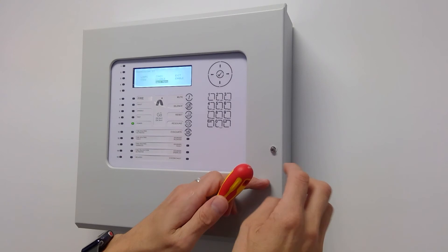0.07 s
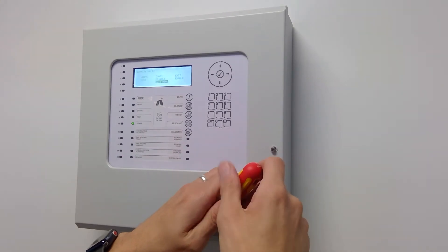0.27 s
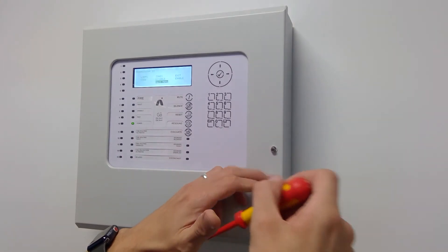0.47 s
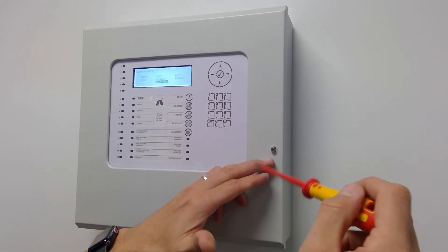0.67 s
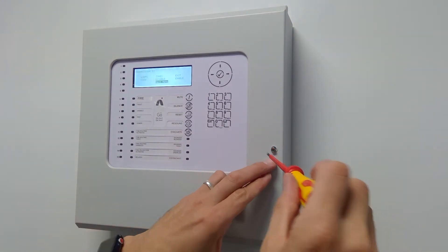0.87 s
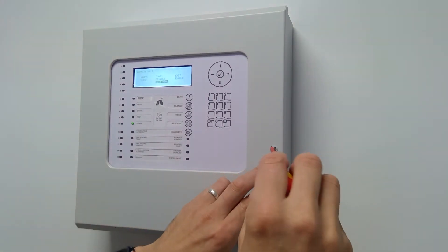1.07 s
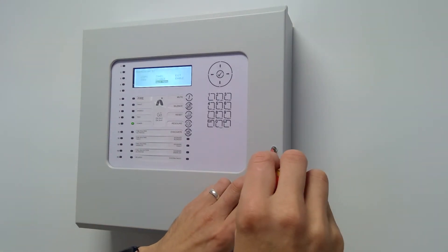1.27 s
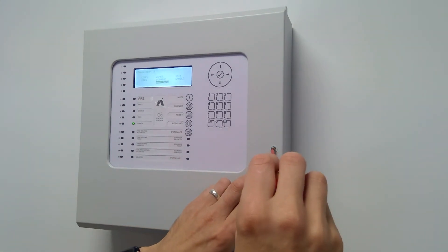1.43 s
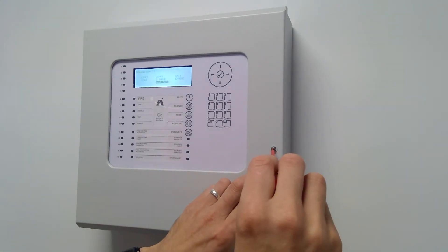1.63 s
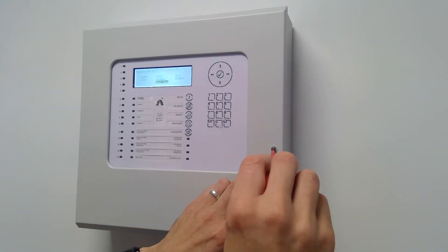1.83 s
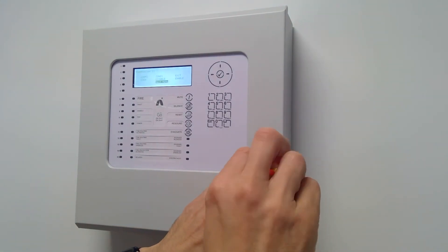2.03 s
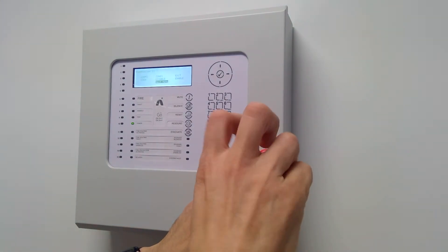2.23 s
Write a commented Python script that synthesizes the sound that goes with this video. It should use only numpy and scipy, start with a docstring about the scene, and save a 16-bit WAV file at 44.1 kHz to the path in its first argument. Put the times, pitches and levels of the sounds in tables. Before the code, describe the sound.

A sheet-metal cabinet door gives one loud ringing clunk, then a softer, duller one; after a lull, light screwdriver ticks and faint finger rubs. Small quiet room, low rumble, close microphone, contacts slightly right.

```python
"""Over a low, uneven rumble in a small, quiet room, hands rub lightly over a sheet-metal cabinet door.
The door is pushed home on its hinges with a strong clunk and then a softer one, faint pings between.
After a lull a screwdriver ticks and catches at its edge, amid rubs and the groans of a fingertip.
Blows, ticks and rubs are forces convolved with one panel's ring; groans and pings are swept or decaying
sines with a room echo. All contacts sit a little right of a close microphone."""
import sys
import numpy as np
from scipy import signal
from scipy.fft import rfft, irfft
from scipy.io import wavfile
from scipy.ndimage import uniform_filter1d

SR = 44100
rng = np.random.default_rng(int(sys.argv[2]) if len(sys.argv) > 2 else 0)


def output_pcm(signal):
    """Save a mono or channel-first signal as 16-bit PCM at the path in sys.argv[1].

    Samples are clipped to [-1, 1] before scaling.
    """
    pcm = np.clip(np.atleast_2d(signal).T, -1, 1) * 32767
    wavfile.write(sys.argv[1], SR, np.round(pcm).astype(np.int16))


N = 101429
T = np.arange(N) / SR
F = np.fft.rfftfreq(2 * N, 1 / SR)  # bins of the double-length transform, in Hz

# All levels are relative: further trims and filters shape the final loudness.
# Rumble over time: (time [s], level [dB])
RUMBLE_LEVEL = [(0.0, -42.5), (0.22, -48), (0.58, -44.5), (0.62, -43), (0.65, -48.5), (1.2, -59),
                (1.27, -69), (1.57, -69), (1.84, -48), (1.91, -60.5), (2.19, -53), (2.3, -57.5)]
# Rumble spectrum: (frequency [Hz], density [dB per Hz])
RUMBLE_SPECTRUM = [(10, 0), (22, 2.5), (45, -2), (80, -17.5), (130, -22.5), (200, -40), (300, -38),
                   (600, -56), (1500, -76)]
# Hiss spectrum: (frequency [Hz], density [dB per Hz])
HISS_SPECTRUM = [(100, -8), (400, -15.5), (1200, -7.5), (4000, -24.5), (15000, -20)]
RUMBLE_DB, HISS_DB = 2.5, -95
WHINE_HZ, WHINE_DB = 1295, -105

# Sliding contacts: (start [s], length [s], level [dB], bass [dB], body [dB], treble [dB])
RUBS = [(0.0, 0.026, -37.5, 18.5, 14.5, 7), (0.058, .03, -32, 17, -7, 14), (0.085, 0.0097, -57, 18, 36, 17),
        (0.118, .035, -51.5, 25, 2, 16), (0.15, 0.04, -43.5, 8, -18, 27.5),
        (0.485, 0.017, -41.5, -12.5, 0, 14), (0.752, 0.037, -62.5, 30, 21, 5),
        (0.869, .19, -82.5, 41, 15, -3.5), (1.732, 0.0075, -52, -9, 19, -3),
        (2.012, 0.028, -60, 29.5, 19.5, -16.5), (2.083, .14, -71.5, 38, 31.5, -6.5)]
RUB_RING_DB, RUB_RATE_PER_S, RUB_TOP_HZ = -26, 1800, 9000

# Fingertip juddering on paint: (start [s], swell time scale [s], mean pitch [Hz], level [dB])
JUDDERS = [(0.084, 0.025, 730, -46), (0.12, 0.048, 620, -61), (1.644, 0.026, 662.6, -47.5),
           (1.758, 0.038, 630, -59.5), (2.0, 0.011, 410, -68), (2.018, 0.063, 760, -68),
           (2.048, 0.028, 787, -52), (2.049, 0.044, 402.6, -54.5)]
JUDDER_WIDTH = 0.067  # rms pitch waver, as a fraction of the pitch
JUDDER_ROOM_DB = -4.5

# Light contacts of tool and fingers:
# (time [s], level [dB], bass [dB], body [dB], treble [dB], ring of the modes [dB], top [Hz])
TICKS = [(0.086, -42, 5, 24, 22.5, -26, 9655), (0.170, -33, -0.5, -11, 11.5, -13, 13000),
         (0.499, -40, -10, 4.5, 16, -14.5, 7700), (1.632, -53, -6, -4, 24, -20, 10280),
         (1.6435, -27, -26, 1, 18.5, -15.5, 13000), (1.6485, -26.5, -10.5, 6, -4, -9.5, 12900),
         (1.658, -26, -6, -3, -5, -16.5, 10900), (1.729, -37, -5, 10, 0, -5, 8060),
         (1.736, -39.5, -1, 13.5, -30, -21, 6020), (1.8025, -35.5, 5.5, -13, 25, 1, 12400),
         (1.8085, -17.5, -13, 0.5, -6, -18, 13100), (1.8115, -33, 5.5, 2.5, 3.5, -10.5, 12200),
         (2.043, -35, -15, -14, 5.5, -15, 5950), (2.0485, -36.5, 12, 10.5, 0, -19.5, 6100),
         (2.053, -45.5, 10, 10.5, 1, -12.5, 6000), (2.162, -62, 13.5, 9, -6.5, -10, 5000)]
GRIP_DB_PER_S = 36.5  # damping by the hands during ticks and rubs
# Resonances favoured near the door's edge: (frequency [Hz], gain [dB])
EDGE = [(80, -10), (150, 7.5), (210, -8), (310, 0), (450, -2), (570, 1), (690, 5), (820, 0), (1080, -4.5),
        (1400, 3), (1800, -3), (2250, -1), (2900, -2), (3500, -4)]

# Door blows: (time [s], level [dB], bass [dB], body [dB], treble [dB], ring of the modes [dB],
# damping by the hand [dB per s, sign ignored])
CLUNKS = [(0.202, -1, -0.5, 3, -0.5, -1.5, -4.5), (0.556, -15.5, 4.5, 9, -6.5, -0.5, 13)]

# Screwdriver touching metal: (time [s], level [dB], factor on pitch and decay rate [ratio])
TIPS = [(0.494, -66, 0.41), (0.5, -59.5, 0.57), (1.632, -51.5, 0.95)]
# Its ring at factor 1: (frequency [Hz], level [dB], t60 [s])
TIP_MODES = [(3850, -9, 0.022), (7530, -0.5, 0.023), (7800, -2, 0.0079), (9480, -17, 0.013)]
TIP_ROOM_DB = 5.5

# Centres of the bass, body, middle and treble of a contact: (frequency [Hz])
COLOUR_HZ = [250, 700, 2200, 7500]
# The door's clear modes, before any hand damping:
# (frequency [Hz], level in first blow [dB], level in later contacts [dB], t60 [s])
MODES = [(166, -25, -18, .55), (231, -10, -6, .26), (285, -13, -16, .42), (335, -13, -12, .2),
         (368, -6, -13, .16), (522, -15, -10, .22), (561, -11, -15, .27), (731, -14, -11, .22),
         (1120, -15, -20, .18), (1190, -16, -16, .22), (1716, -17, -20, .24), (1925, -6, -14, .18),
         (2649, -1, -15, .14), (3537, -17, -19, .2), (982, -23, -24, .45), (1290, -32, -20, .4),
         (2355, 2, 0, .2)]
MODE_DB, MODE_LATE_SHARE, MODE_BUILD_S = -14, .6, 0.0075
# Dense wash of panel and room: (frequency [Hz], density [dB per Hz])
WASH = [(60, -33), (150, -13.5), (290, 1.5), (400, -3.5), (620, -9), (900, -11.5), (1500, -13), (2100, -9),
        (2500, -8), (3100, -16.5), (4500, -18.5), (6500, -28), (10000, -36.5), (15000, -40.5)]
# Its decay before any hand damping: (frequency [Hz], t60 [s])
WASH_T60 = [(100, .5), (260, 0.26), (700, 0.27), (1840, 0.25), (4850, 0.17), (12800, 0.063)]
# Direct sound and first reflections: (delay [s], level [dB])
PATHS = [(0, 3), (.003, -2), (.0087, -1.5)]
WASH_DB, DIRECT_DB = -17.5, 3.5
CROWD_DB, CROWD_T60_S = -33.5, .24  # weak upper modes, before hand damping

# Left minus right: (frequency [Hz], level difference [dB])
BALANCE = [(100, -.6), (600, -1.2), (1300, -3), (2400, -6.5), (4400, -8), (8000, -7), (15000, -5)]
# Likeness of the two channels: (frequency [Hz], correlation [0-1])
LIKENESS = [(300, 0.96), (700, 0.55), (2000, 0.28), (5000, 0.84), (12000, 0.27)]
LEFT_LAG_S, ROOM_T60_S, TOP_HZ = .00008, 0.079, 15900


def undb(db):
    """Decibels to gain."""
    return 10 ** (np.asarray(db) / 20)


def at(table, hz):
    """Read a table on a log-frequency axis."""
    points = np.array(table, float)
    return np.interp(np.log(np.maximum(hz, 1)), np.log(points[:, 0]), points[:, 1])


def unit(x):
    """Scale to rms 1."""
    return x / np.sqrt(np.mean(x ** 2))


def decay(age, t60):
    """Exponential decay that falls 60 dB in t60 seconds."""
    return np.exp(-np.log(1000) * age / t60)


def through(x, response):
    """Filter by a frequency response."""
    return irfft(rfft(x, 2 * N) * response)[..., :N]


def causal(db):
    """The quickest causal (minimum-phase) response with these gains, by folding the cepstrum."""
    cepstrum = irfft(np.log(undb(db)))
    cepstrum[1:N] *= 2
    cepstrum[N + 1:] = 0
    return np.exp(rfft(cepstrum))


def rolloff(hz):
    """Gain in dB of a steep low-pass."""
    return -10 * np.log10(1 + (F / hz) ** 8)


def noise_pair(likeness):
    """Left and right noise, partly alike."""
    mid, side = rng.standard_normal((2, N))
    c = np.clip(likeness, 0, 1)
    return np.sqrt((1 + c) / 2) * mid + np.sqrt((1 - c) / 2) * np.array([side, -side])


def damped(body, db_per_s):
    """A hand on the sheet shortens its ring."""
    return body * undb(-abs(db_per_s) * T)


def echoed(x, likeness, room_db):
    """Add the short echo of the room, a decaying noise response."""
    room = noise_pair(likeness) * decay(T, ROOM_T60_S)
    return x + undb(room_db) * through(x, rfft(unit(room) / np.sqrt(N), 2 * N))


def background():
    """A low rumble that comes and goes, very faint hiss and a trace of steady whine."""
    level = undb(RUMBLE_DB + np.interp(T, *np.array(RUMBLE_LEVEL).T))
    rumble = unit(through(noise_pair(0.99), undb(at(RUMBLE_SPECTRUM, F))))
    whine = undb(WHINE_DB) * np.sin(2 * np.pi * WHINE_HZ * T)
    hiss = unit(through(noise_pair(0.6), undb(at(HISS_SPECTRUM, F))))
    return level * rumble + whine + undb(HISS_DB) * hiss


def wash():
    """The crack of a contact, its first reflections, and the dense ring of panel and room."""
    out, power = 0, 0
    for hz in 63 * 2 ** (np.arange(25) / 3):  # third-octave bands
        shape = np.cos(np.pi / 2 * np.clip(3 * np.log2((F + 1) / hz), -1, 1))
        fall = undb(-60 * T / at(WASH_T60, hz))
        band = through(noise_pair(at(LIKENESS, hz)), shape) * fall
        gain = undb(at(WASH, hz)) * np.sqrt(hz)  # bands widen with frequency
        out = out + gain * unit(band) * np.sqrt(np.mean(fall ** 2))
        power += gain ** 2
    paths = np.zeros(N)
    for delay, db in PATHS:
        paths[int(delay * SR)] += undb(db)
    crack = unit(through(paths, causal(at(WASH, F)))) / np.sqrt(N)
    return undb(WASH_DB) * out / np.sqrt(power) + undb(DIRECT_DB) * crack


def crowd(count=360):
    """Many weak modes of the sheet, scattered over the treble along the wash's spectrum."""
    lines = np.zeros((2, len(F)), complex)
    for u, size, left, right in rng.random((count, 4)):
        hz = 2800 * 5 ** u
        strength = undb(at(WASH, hz)) * np.sqrt(hz) * size ** 2
        phases = np.exp(2j * np.pi * np.array([left, right]))
        lines[:, np.searchsorted(F, hz)] += strength * phases
    return undb(CROWD_DB) * unit(irfft(lines)[:, :N]) * decay(T, CROWD_T60_S)


def ring():
    """The door's modes for two places of contact; part builds up as the blow spreads through the sheet."""
    build = 1 - MODE_LATE_SHARE * np.exp(-T / MODE_BUILD_S)
    out = np.zeros((2, N))
    for hz, first_db, later_db, t60 in MODES:
        out += undb([[first_db], [later_db]]) * np.sin(2 * np.pi * hz * T) * decay(T, t60)
    return undb(MODE_DB) * build * out


def touch(force, body, level_db, bass_db, body_db, treble_db, top_db=0):
    """A force sounds the door, coloured by the place and hardness of the contact."""
    colour = at(list(zip(COLOUR_HZ, (bass_db, body_db, 0, treble_db))), F)
    return through(body, rfft(force, 2 * N) * causal(level_db + colour + top_db))


def rubs(dense, modes):
    """Stick and slip: a brief swell of tiny uneven catches."""
    body = dense + undb(RUB_RING_DB) * modes
    out = 0
    for start, length, db, bass, mid, treble in RUBS:
        swell = np.sqrt(np.abs(np.sin(np.pi * np.clip((T - start) / length, 0, 1))))
        catches = rng.random(N) < RUB_RATE_PER_S / SR
        force = swell * catches * rng.standard_normal(N)
        force = force / (np.linalg.norm(force) + 1e-12)
        out = out + touch(force, body, db, bass, mid, treble, rolloff(RUB_TOP_HZ))
    return out


def judders():
    """Brief rough groans as a fingertip sticks and slips, with their echo in the room."""
    out = 0
    for start, length, hz, db in JUDDERS:
        age = np.maximum(T - start, 0) / length
        swell = np.sqrt(age) * np.exp(.5 - 2 * age ** 2) * np.sqrt(2)
        waver = unit(uniform_filter1d(rng.standard_normal(N), size=150))
        phase = 2 * np.pi * np.cumsum(hz * (1 + JUDDER_WIDTH * waver)) / SR
        out = out + undb(db) * np.sqrt(2) * swell * np.sin(phase)
    return echoed(out, 0.93, JUDDER_ROOM_DB)


def ticks(dense, modes):
    """Light sharp contacts, each an impulse on the door with its own limit on the top."""
    out = 0
    for k, (start, db, bass, mid, treble, ring_db, top_hz) in enumerate(TICKS):
        impulse = signal.unit_impulse(N, int(start * SR))
        body = dense[k % len(dense)] + undb(ring_db) * modes  # alternate the two washes
        out = out + touch(impulse, body, db, bass, mid, treble, rolloff(top_hz))
    return out


def clunks(dense, modes):
    """The door knocks against its frame, each time at another place with another mode balance."""
    out = 0
    for place, (start, db, bass, mid, treble, ring_db, damping) in zip(modes, CLUNKS):
        impulse = signal.unit_impulse(N, int(start * SR))
        body = damped(dense + undb(ring_db) * place, damping)
        out = out + touch(impulse, body, db, bass, mid, treble)
    return out


def tip():
    """Tiny pings of the screwdriver and their echo in the room; lower ones last longer."""
    ping = 0
    for start, level_db, pitch in TIPS:
        age = np.maximum(T - start, 0) * pitch  # stretched time lowers pitch and slows decay
        for hz, db, t60 in TIP_MODES:
            ping = ping + undb(level_db + db) * np.sin(2 * np.pi * hz * age) * decay(age, t60)
    return echoed(ping, 0, TIP_ROOM_DB)


def scene():
    """All contacts reach the right side first and louder, over the background."""
    upper, modes = crowd(), ring()
    dense = [wash() + upper for _ in range(2)]
    held = damped(np.array(dense), GRIP_DB_PER_S)
    held_modes = damped(modes[-1], GRIP_DB_PER_S)
    light = ticks(held, held_modes) + rubs(held[-1], held_modes)
    light = through(light, causal(at(EDGE, F)))
    left, right = clunks(dense[0], modes) + light + tip() + judders()
    lean = undb(at(BALANCE, F) / 2)  # half the difference goes to each side
    lag = np.exp(-2j * np.pi * F * LEFT_LAG_S)
    return np.array([through(left, lean * lag), through(right, 1 / lean)]) + background()


def record(dry):
    """The recorder cuts the top with a steep elliptic low-pass."""
    return signal.sosfilt(signal.ellip(8, .2, 70, TOP_HZ, fs=SR, output="sos"), dry)


dry = scene()
out = record(dry)
output_pcm(out)
```